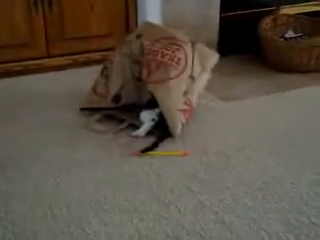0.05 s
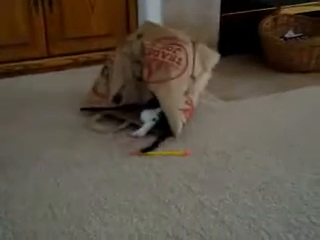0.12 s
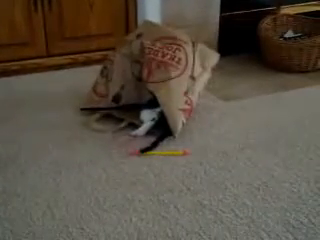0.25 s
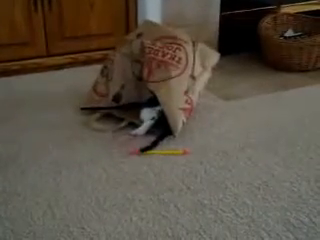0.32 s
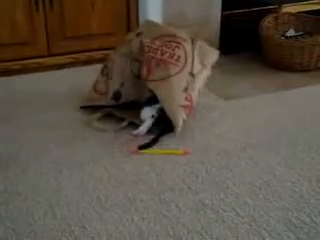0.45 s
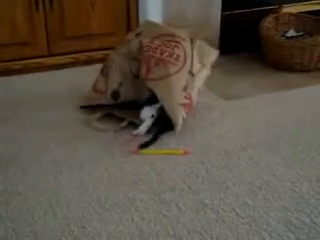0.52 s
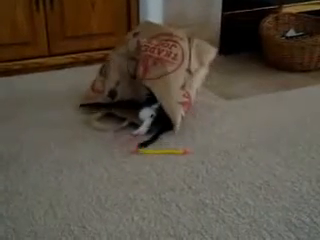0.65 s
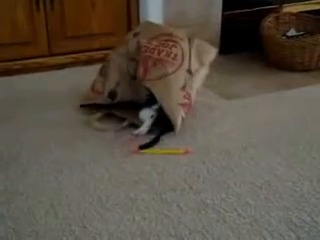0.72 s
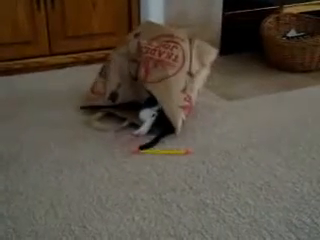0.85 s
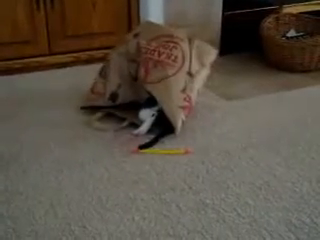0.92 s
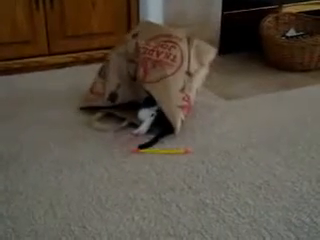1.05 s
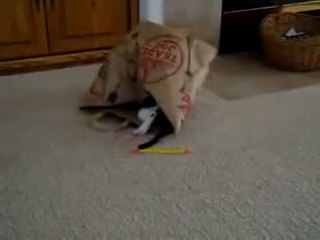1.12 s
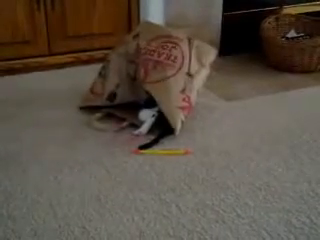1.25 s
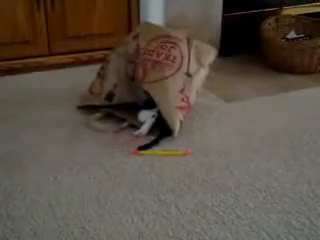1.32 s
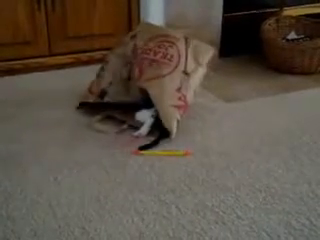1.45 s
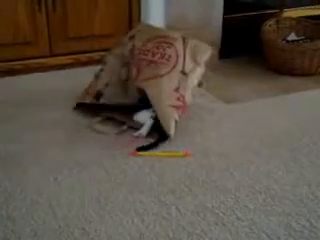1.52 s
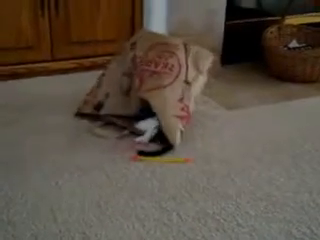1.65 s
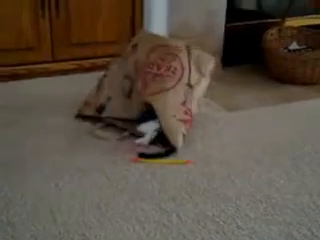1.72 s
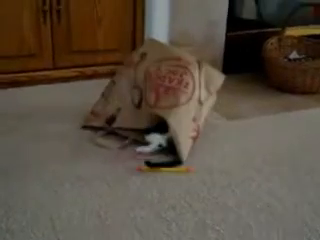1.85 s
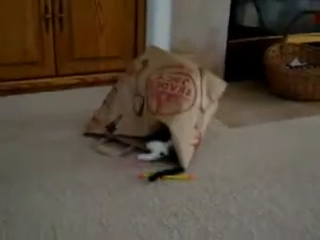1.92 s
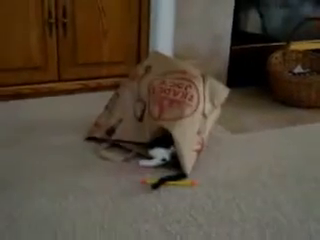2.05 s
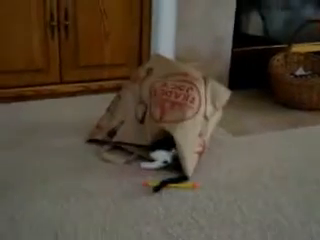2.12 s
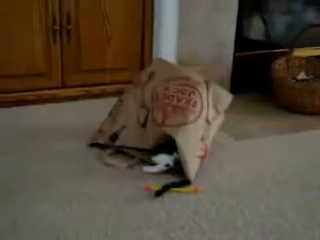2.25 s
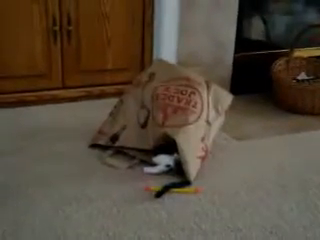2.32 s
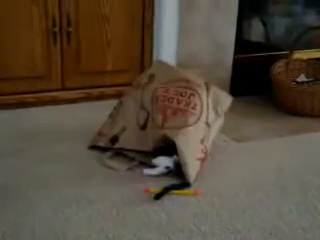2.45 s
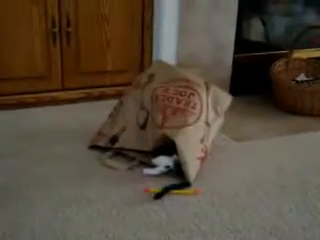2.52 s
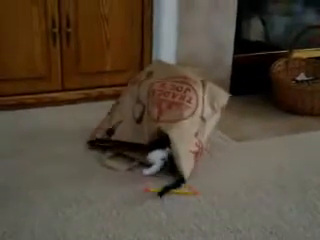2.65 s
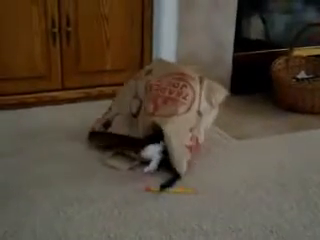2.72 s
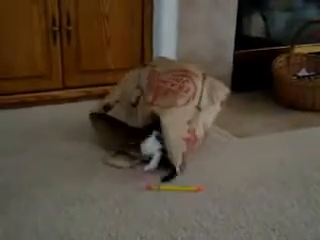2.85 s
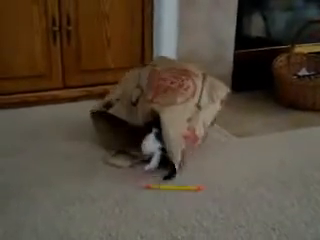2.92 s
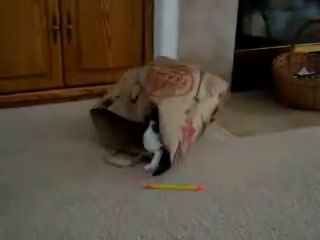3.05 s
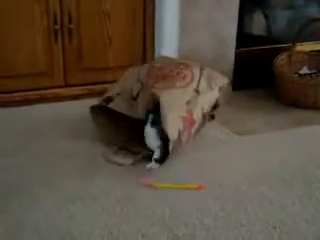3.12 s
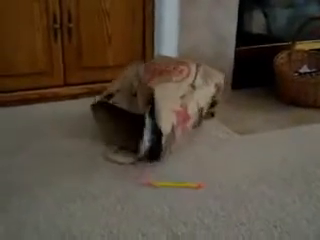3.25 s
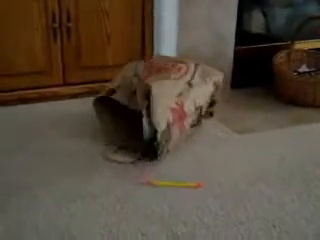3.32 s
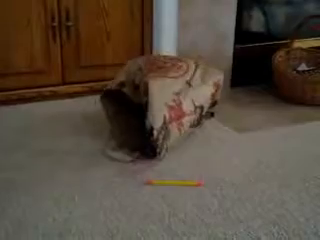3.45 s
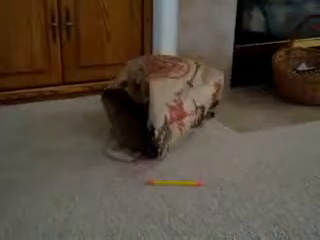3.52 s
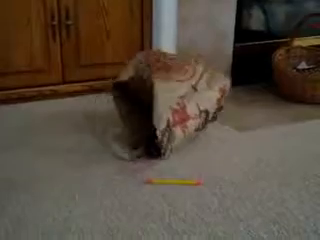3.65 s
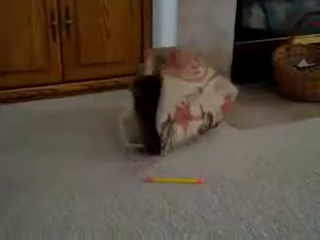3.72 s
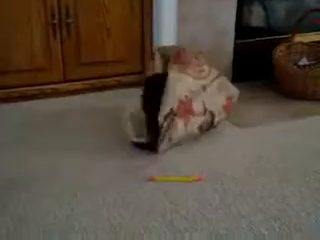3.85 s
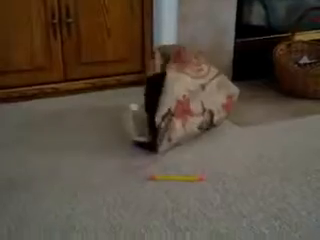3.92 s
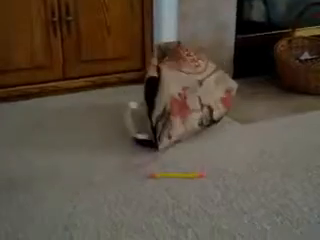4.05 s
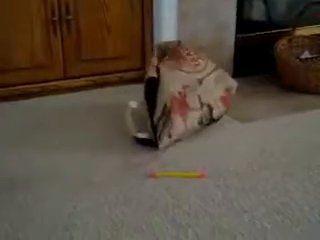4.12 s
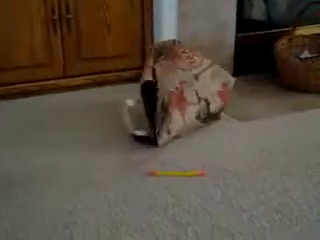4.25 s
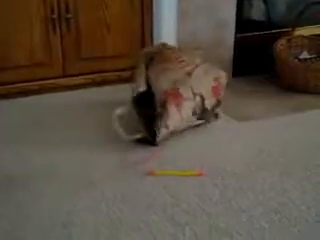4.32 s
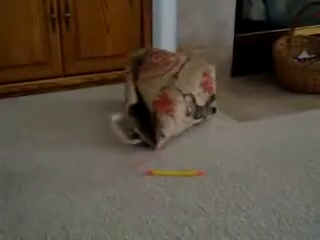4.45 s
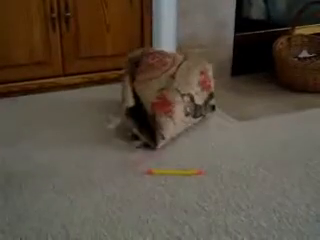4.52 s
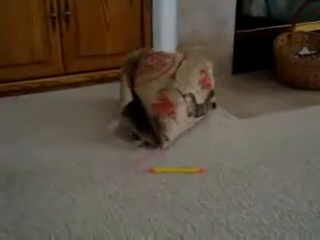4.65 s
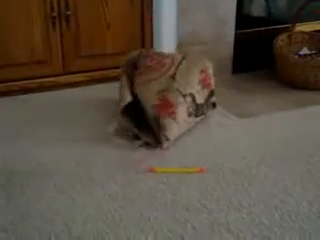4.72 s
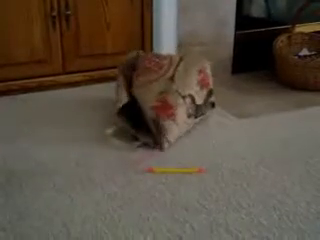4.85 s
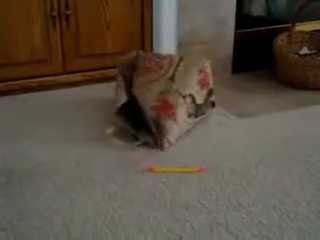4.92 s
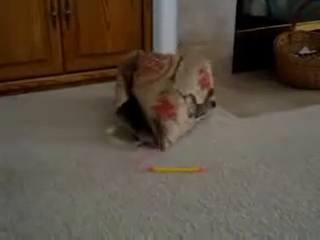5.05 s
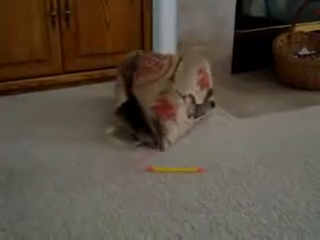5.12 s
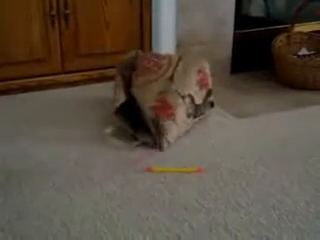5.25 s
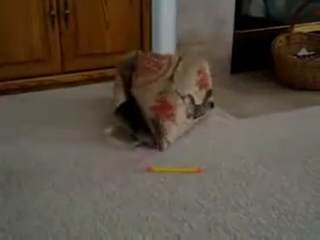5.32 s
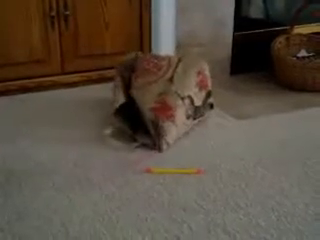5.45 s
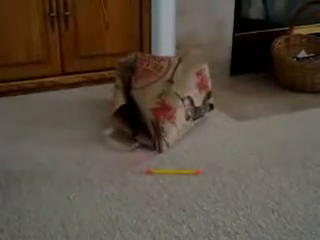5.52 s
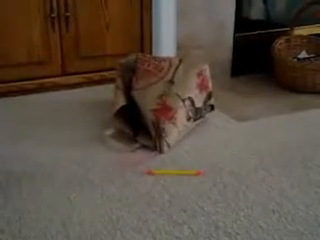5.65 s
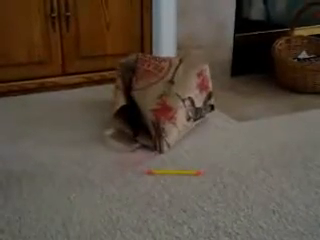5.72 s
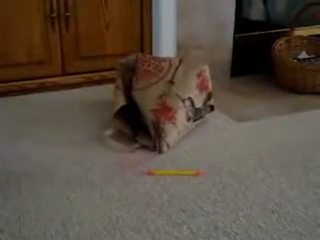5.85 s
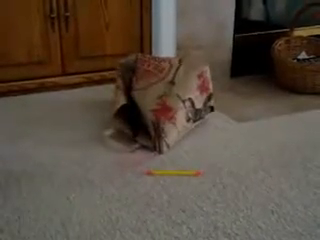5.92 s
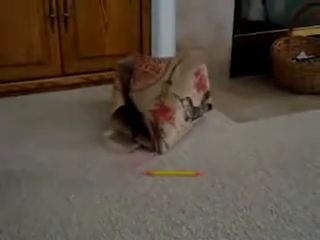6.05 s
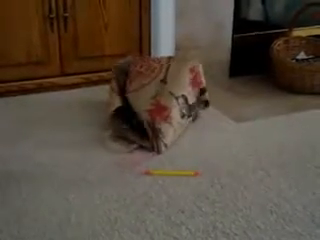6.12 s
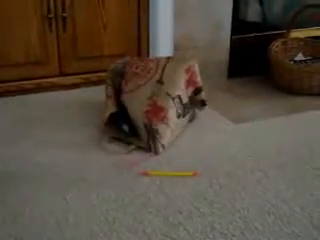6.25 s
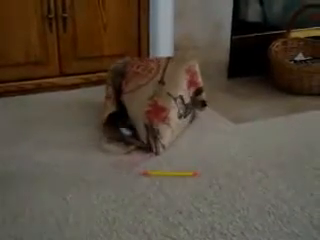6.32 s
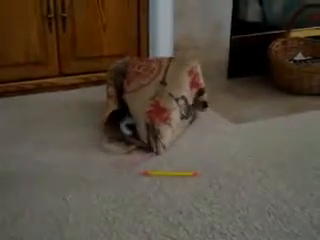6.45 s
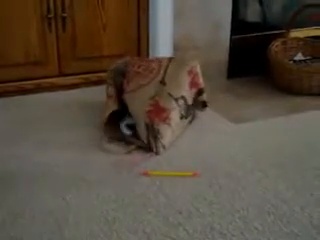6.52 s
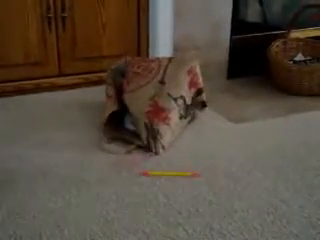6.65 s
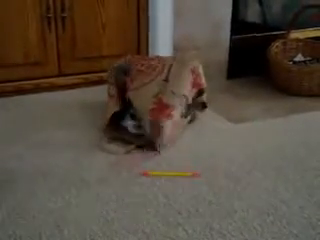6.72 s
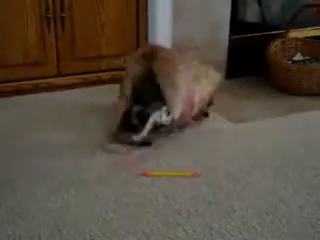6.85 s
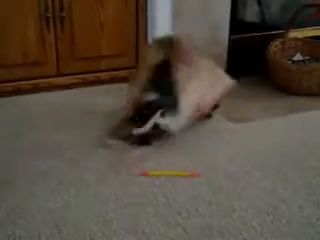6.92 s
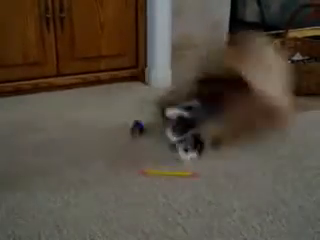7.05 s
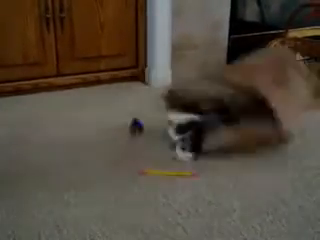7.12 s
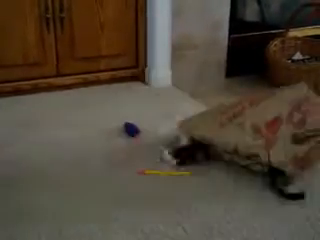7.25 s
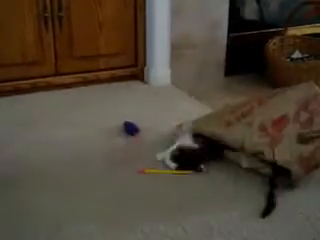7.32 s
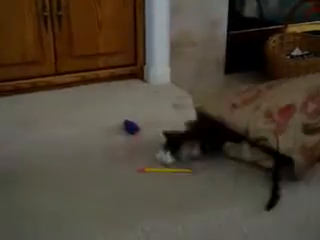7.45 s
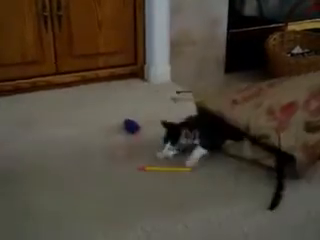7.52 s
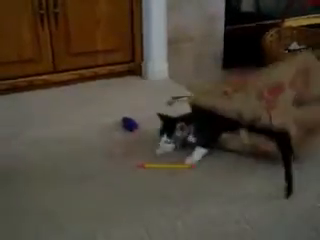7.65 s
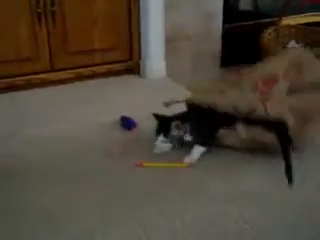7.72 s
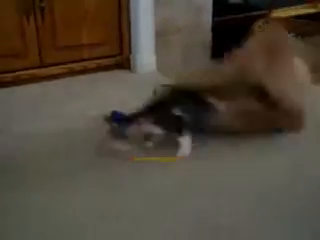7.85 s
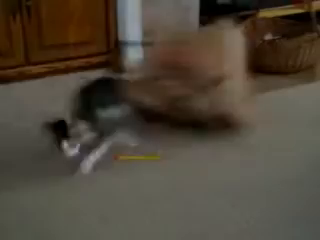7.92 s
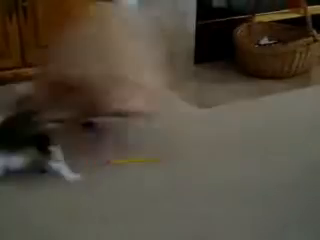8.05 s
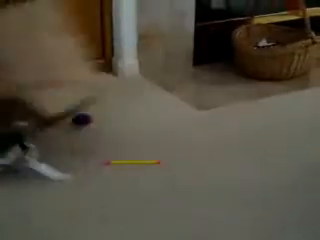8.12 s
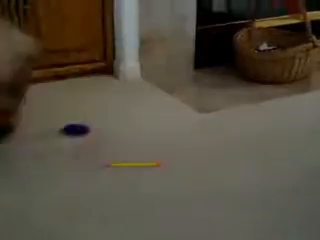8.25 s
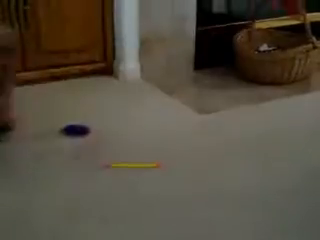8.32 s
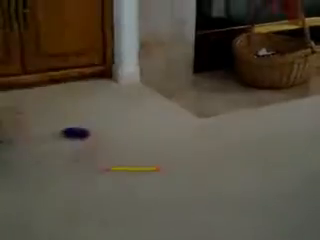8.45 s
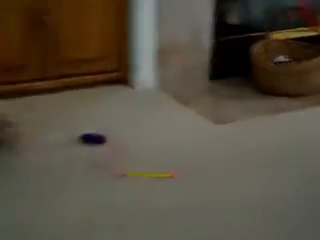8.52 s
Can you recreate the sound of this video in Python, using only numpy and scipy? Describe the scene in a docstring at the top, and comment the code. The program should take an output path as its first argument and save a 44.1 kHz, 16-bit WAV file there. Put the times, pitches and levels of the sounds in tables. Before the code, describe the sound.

Dry, stiff paper crinkles unevenly in a small carpeted room with a faint hiss. Quiet isolated snaps grow into clusters of hollow buckling, low soft thumps of air and dense crackle, then stop for over a second. Rustling resumes briefly before the loudest burst, harsh and rapid, as the animal rushes out dragging the bag; it thins quickly. Heard through a modest handheld camera microphone.

```python
"""Sharp snaps, dense crackle and low puffs: a cat wriggles in a paper grocery bag on carpet, rests, then bolts.
Snaps are noise bursts with a pitched flutter and a low boom; rustle is random ringing clicks plus sliding noise.
Both pass through the paper's dispersion and colour; puffs are low-passed air pulses.
A small furnished room adds a diffuse tail and a hush; a small camera records at half the sample rate."""
import sys
import numpy as np
from scipy import signal
from scipy.fft import rfft, irfft, next_fast_len
from scipy.io import wavfile
from scipy.ndimage import uniform_filter1d, map_coordinates

SR = 44100
rng = np.random.default_rng(int(sys.argv[2]) if len(sys.argv) > 2 else 0)


def generate_wav(sig):
    """Save sig (samples, or channels by samples) to the path in sys.argv[1] as 16-bit PCM at SR."""
    pcm = np.round(np.clip(np.atleast_2d(sig).T, -1, 1) * 32767).astype(np.int16)
    wavfile.write(sys.argv[1], SR, pcm)


N = 377937


def snaps(rows, rise_share=0.33, flutter_stretch=4.1, flutter_db=-9, cycles=7, panel_db=-11,
          boom_stretch=4.2, boom_db=-8, boom_hz=520, gain_db=2):
    """Panels buckle: short ones tick, long ones swell and crumple; width sets pitch and hollowness;
    each flutters and booms."""
    mid_width_cm, mid_pitch_hz, mid_body_db = 10.11, 1085, 3.5  # middling panel
    body_db_per_octave = 13  # per doubling of width
    lead = SR // 50
    out = np.zeros(N + SR)
    t = np.arange(-lead, SR // 6) / SR
    for start_s, level_db, width_cm, t60_s, edge_db in rows:
        # wider panels are lower and more hollow
        pitch_hz = mid_pitch_hz * mid_width_cm / width_cm
        body_db = mid_body_db + body_db_per_octave * np.log2(width_cm / mid_width_cm)
        grit, flutter, slow = rng.standard_normal((3, len(t)))

        fall_db = 60 * np.maximum(t, 0) / t60_s
        rise = amp(60 * np.minimum(t, 0) / (rise_share * t60_s))
        envelope = rise * (amp(-fall_db) + amp(flutter_db - fall_db / flutter_stretch))

        ringing = unit(signal.fftconvolve(flutter, ring(pitch_hz, cycles))[:len(t)])
        panel = amp(panel_db) * envelope * ringing

        boom = signal.sosfilt(signal.butter(2, boom_hz, fs=SR, output="sos"), slow)
        boom = boom * rise * amp(boom_db - fall_db / boom_stretch)  # slowest decay

        snap = tint(grit * envelope + boom, body_db, edge_db) + panel
        attack = envelope[lead:lead + SR // 100]  # level reference: envelope over the first 10 ms
        attack_rms = np.sqrt(np.mean(attack ** 2))
        first = round(start_s * SR) - lead
        out[first:][:len(t)] += amp(level_db + gain_db) * snap / (2 * attack_rms)
    return out[:N]


def extra_snaps(move_db, rate_hz=9, over_db=1, scatter_db=2, width_cm=9, width_octaves=0.71,
                t60_s=0.011, edge_db=-3, count=90):
    """Extra snaps at random moments, as hard as the paper is moved; rows for snaps()."""
    slot, size, width = rng.random((count, 3)).T
    times_s = (np.arange(count) + slot) / rate_hz
    rows = []
    for start_s, a, b in zip(times_s, size, width):
        if SR // 50 < start_s * SR < N:
            level_db = move_db[int(start_s * SR)] + over_db + scatter_db * (2 * a - 1)
            panel_cm = width_cm * 2 ** (width_octaves * (2 * b - 1))
            rows.append((start_s, level_db, panel_cm, t60_s, edge_db))
    return rows


def movement():
    """Each move rises, holds and settles; returns level, and power-weighted body and edge, all in dB."""
    # cat's wriggles, shoves and dashes: t/s, hold/s, relative level/dB, hollow body/dB, crisp edge/dB
    moves = [(0.592, 0.077, -44.5, 6, 3), (0.979, 0.023, -39.5, 5, -10.5), (1.498, 0.17, -48, 12.5, 7.5),
             (1.818, 0.11, -38.5, 13.5, 2), (1.945, 0.048, -32.5, 9.5, 3), (2.085, 0.038, -39, 1, 5),
             (2.21, 0.3, -56.5, 5, 10.5), (2.784, .09, -50.5, 26.5, 9), (2.906, .03, -35, 12, 3.5),
             (2.974, 0.25, -38.5, 13.5, 1), (3.284, 0.11, -46, 10.5, -7), (3.575, 0.026, -45, 21, -17),
             (3.672, .03, -38, 8, -1), (3.775, 0.049, -24, 4.5, -4), (3.91, 0.066, -29.5, 6, -1),
             (4.1, .02, -46, 17, 8.5), (4.171, 0.14, -37.5, 10, 3.5), (4.366, 0.15, -31.5, 13, -2.5),
             (4.586, 0.076, -30.5, 8, -1), (4.714, 0.18, -37, 8, 3.5), (4.901, 0.084, -40.5, 6.5, 4),
             (5.166, .1, -54, 2, 4.5), (5.72, 0.094, -57.5, 20, -6), (6.03, 0.046, -48, 16.5, 3),
             (6.22, 0.06, -39, 12.5, 3.5), (6.341, .13, -37.5, 5, 4.5), (6.772, 0.036, -49, 4, 17),
             (6.89, 0.037, -35, 9, 5.5), (6.956, 0.13, -19, 1.5, 4.5), (7.169, 0.17, -19.5, 2.5, 2.5),
             (7.378, 0.056, -29, 7, -1), (7.586, 0.018, -27.5, -0.5, -1.5), (7.735, 0.13, -40, 7, -11),
             (7.865, 0.23, -25.5, 4.5, 4), (8.312, 0.015, -21.5, -6, 3.5), (8.438, .12, -42, -23, -2.5)]
    rise_db_per_s, settle_db_per_s = 392.5, 207
    fidget_db, fidget_body_db, fidget_edge_db = -58.5, 5, 2.5  # the cat is never quite still
    t = np.arange(N) / SR
    power = np.full(N, amp(fidget_db) ** 2)
    body = fidget_body_db * power
    edge = fidget_edge_db * power
    for start_s, hold_s, level_db, body_db, edge_db in moves:
        before_db = rise_db_per_s * np.maximum(start_s - t, 0)
        after_db = settle_db_per_s * np.maximum(t - start_s - hold_s, 0)
        below_db = before_db + after_db
        near = below_db < 60
        push = amp(level_db - below_db[near]) ** 2
        power[near] += push
        body[near] += push * body_db
        edge[near] += push * edge_db
    return 10 * np.log10(power), body / power, edge / power


def rustle(level_db, body_db, edge_db, rate_hz=1100, spread_db=2.5, clump_db=2.0, calm_db=-10,
           busy_db=-5, slide_db=-6, cycles=4, count=7):
    """Slow movement mostly slides paper over fur and carpet; fast movement also folds clumps of creases."""
    crackle = 0
    for pitch_hz in np.geomspace(600, 7000, num=count):  # crease lengths, each with its own pitch
        clicks = creases(rate_hz / count, spread_db)
        crackle = crackle + pitch_hz * signal.oaconvolve(clicks, ring(pitch_hz, cycles))[:N]
    crackle_db = np.interp(level_db, [-42, -22], [calm_db, busy_db])
    slide = amp(slide_db) * rng.standard_normal(N)
    motion = amp(crackle_db) * unit(crackle) + slide
    clumping = amp(level_db + clump_db * wobble(55))
    return clumping * tint(patchy(motion, depth_db=2.5), body_db, edge_db)


def creases(rate_hz, spread_db):
    """Tiny creases give way at random moments: most are weak, a few stand out."""
    size = amp(spread_db * np.minimum(rng.exponential(size=N), 3))
    fires = rng.random(N) < rate_hz / SR
    clicks = fires * rng.choice([-1, 1], N) * unit(size)
    return clicks * np.sqrt(SR / rate_hz)  # rms near 1 at any rate


def patchy(x, depth_db):
    """As the bag changes shape, different bands of the paper stand out from moment to moment."""
    z = signal.stft(x, nperseg=512)[2]
    field = uniform_filter1d(rng.standard_normal(z.shape), size=7, axis=0)  # across bins
    field = uniform_filter1d(field, size=6, axis=1)  # across frames
    shaped = signal.istft(z * amp(depth_db * unit(field)), nperseg=512)[1][:N]
    return np.std(x) * unit(shaped)


def bag(x, travel_1khz_s=0.001505):
    """Bending waves disperse over the paper, bass behind treble, and radiate with its colour."""
    # paper's radiation colour: f/Hz, relative density/dB per Hz
    paper_colour = [(24, -45), (40, -45.5), (103, -28), (269, -6.5), (360, -6), (403, -1.5), (675, -4),
                    (789, -0.5), (1690, -1.5), (1850, -1.5), (2590, -1), (4540, -10), (8500, -21.5),
                    (11000, -36.5), (18700, -120)]
    spread = filtered(x, lambda hz: np.exp(-4j * np.pi * travel_1khz_s * np.sqrt(1000 * hz)))
    colour = causal(lambda hz: amp(along(paper_colour, hz)))
    return signal.oaconvolve(spread, colour)[:N]


def puffs(rise_s=0.0018, decay_s=.006, top_hz=130):
    """A bag wall caves in and shoves out one low gust of air."""
    # air pushed out of the bag: t/s, peak level/dB
    puff_rows = [(3.719, -40), (4.265, -38.5), (6.944, -36.5), (7.856, -59)]
    out = np.zeros(N + SR)
    t = np.arange(SR // 4) / SR
    push = np.exp(-t / decay_s) * (1 - np.exp(-t / rise_s))
    gust = signal.sosfilt(signal.butter(2, [35, top_hz], "band", fs=SR, output="sos"), push)
    gust = gust / np.abs(gust).max()
    for start_s, peak_db in puff_rows:
        out[round(start_s * SR):][:len(t)] += amp(peak_db) * gust
    return out[:N]


def room(x, build_s=0.0019):
    """A short diffuse tail, drawn afresh every 40 ms so that no steady tones stand out."""
    # room decay: f/Hz, t60/s
    decay_times = [(150, 0.23), (1000, 0.34), (3000, 0.22), (8000, 0.3)]
    out = np.zeros(N + 2 * SR)
    hop = SR // 25
    for start in range(0, N, hop):
        hz, t, z = signal.stft(rng.standard_normal(SR // 3), SR, nperseg=256)
        decay = amp(-60 * t / along(decay_times, hz)[:, None])
        tail = signal.istft(z * decay, SR, nperseg=256)[1]
        tail = tail * (1 - np.exp(-np.arange(len(tail)) / SR / build_s))
        wet = signal.fftconvolve(x[start:start + hop], tail / np.linalg.norm(tail))
        out[start:start + len(wet)] += wet
    return out[:N]


def room_tone(level_db=-51.5):
    """Steady hush of the house and microphone hiss: filtered noise."""
    # room tone and hiss spectrum: f/Hz, relative density/dB per Hz
    quiet_colour = [(15, -67.5), (25, -37.5), (54, -29.5), (159, -4.5), (241, -4.5), (279, -5), (308, -3),
                    (557, -4), (1220, -9.5), (2830, -17), (3120, -16.5), (6530, -20.5), (9000, -26.5),
                    (11700, -19.5), (19800, -120)]
    hush = filtered(rng.standard_normal(N), lambda hz: amp(along(quiet_colour, hz)))
    return amp(level_db) * unit(hush)


def ring(hz, cycles):
    """Impulse response of a paper patch: a sine falling 60 dB in the given cycles."""
    phase = hz * np.arange(SR // 16) / SR
    return np.sin(2 * np.pi * phase) * amp(-60 * phase / cycles)


def tint(x, body_db, edge_db, body_hz=620, edge_hz=3400):
    """Set the levels of the hollow body (lows) and the crisp edge (highs)."""
    body = filtered(x, lambda hz: 1 / (1 + (hz / body_hz) ** 4))
    edge = filtered(x, lambda hz: 1 - 1 / (1 + (hz / edge_hz) ** 6))
    return amp(body_db) * body + (x - body - edge) + amp(edge_db) * edge


def amp(db):
    """Decibels to gain."""
    return 10 ** (np.asarray(db) / 20)


def unit(x):
    """Scale to rms 1."""
    return x / np.sqrt(np.mean(x ** 2) + 1e-20)


def along(points, hz):
    """Interpolate (f/Hz, value) points on a log-frequency axis."""
    f, v = np.transpose(points)
    return np.interp(np.log(hz + 1), np.log(f + 1), v)


def wobble(knots_per_s):
    """Smooth random curve from normal-distributed knots."""
    knots = rng.standard_normal(4096)
    return map_coordinates(knots, [np.arange(N) * knots_per_s / SR], order=2, mode="wrap")


def filtered(x, response):
    """Apply a frequency response by FFT."""
    m = next_fast_len(x.shape[-1] + SR // 4)
    spectrum = rfft(x, m) * response(np.fft.rfftfreq(m, 1 / SR))
    return irfft(spectrum, m)[..., :x.shape[-1]]


def causal(gain, size=8192):
    """Minimum-phase impulse response of a gain curve, energy 1."""
    curve = np.maximum(gain(np.fft.rfftfreq(size, 1 / SR)), 1e-6)
    cepstrum = irfft(np.log(curve))
    cepstrum[1:size // 2] *= 2
    cepstrum[size // 2 + 1:] = 0
    response = irfft(np.exp(rfft(cepstrum)))
    return response / np.linalg.norm(response)


def scene(snap_room_db=-3, rustle_room_db=-4, rustle_db=-2):
    """Bag, its room echo, puffs and the quiet room."""
    # main snaps: t/s, relative level/dB, panel width/cm, crack t60/s, crisp edge/dB
    main_snaps = [(0.305, -23, 2.6, 0.015, 6.5), (0.317, -32, 2.1, 0.013, 1), (0.64, -43, 6.4, 0.02, 12),
                  (0.687, -38, 22.5, 0.037, -9), (0.724, -25, 7.6, 0.022, -9),
                  (0.949, -30, 10.8, 0.021, -15), (0.992, -38, 11, 0.0082, 11), (0.999, -30, 19, .017, -30),
                  (1.236, -40.5, 0.78, .006, 14), (1.414, -42, 13, 0.029, 5.5),
                  (1.589, -37.5, 10.5, 0.023, -6), (1.788, -39, 13, 0.044, -3),
                  (1.927, -29.5, 8.9, .029, -2), (1.965, -29, 12.4, 0.031, -2),
                  (2.365, -46, 26.6, 0.053, -17), (2.612, -43, 15, 0.052, -25),
                  (2.763, -53, 37, 0.019, -16), (2.793, -36, 12, .031, -21), (2.885, -37, 14, .029, -3),
                  (3.001, -17, 10.6, 0.033, -7.5), (3.033, -20.5, 15, 0.012, -6),
                  (3.09, -29.5, 15.5, 0.05, -19), (3.18, -25.5, 13.2, 0.033, -12),
                  (3.221, -23, 10, 0.04, -23), (3.294, -25.5, 10.1, 0.028, -12.5),
                  (3.482, -30.5, 10, .03, -21), (3.72, -17, 5.8, 0.011, 2.5), (3.734, -22, 7.4, .018, -16),
                  (3.763, -24.5, 9.3, .026, 6.5), (3.89, -20, 14, .036, 6), (3.901, -21, 15.3, 0.025, -11),
                  (4.189, -25.5, 9.2, 0.037, -2), (4.267, -20.5, 2.9, 0.022, 4),
                  (4.35, -24, 6.8, 0.028, 4.5), (4.387, -21.5, 9.8, 0.026, 0),
                  (4.451, -26, 11.4, .036, -25), (4.512, -29.5, 13.7, 0.016, 2.5),
                  (4.572, -24, 13, 0.098, 0.5), (4.592, -18.5, 12, .028, 0.5), (4.649, -25, 16, 0.022, -1),
                  (4.684, -28.5, 9.9, .009, -12), (6.119, -25, 19.5, 0.034, -7),
                  (6.214, -33.5, 10, 0.029, -17), (6.323, -20, 4.2, .022, -3),
                  (6.37, -26.5, 11.5, 0.043, -8), (6.398, -26, 9.4, 0.044, 6),
                  (6.751, -36, 11.3, 0.046, -11), (6.932, -19.5, 11.4, 0.06, -16),
                  (6.947, -13.5, 12, .032, -3.5), (6.965, -18.5, 5.6, 0.025, 7.5),
                  (6.979, -18.5, 7.4, 0.03, -4), (7.012, -15.5, 9.4, .009, -5), (7.051, -16, 6.5, 0.1, 3),
                  (7.146, -12, 2.7, .031, -0.5), (7.154, -15, 6.7, 0.01, -1.5),
                  (7.198, -12.5, 6.2, 0.032, -2), (7.215, -21, 5, 0.024, 11), (7.275, -12, 7.5, .055, -3.5),
                  (7.329, -21.5, 13.5, 0.064, 6), (7.363, -24.5, 7.8, 0.02, -5),
                  (7.507, -24, 7.3, 0.014, -1.5), (7.566, -18.5, 10.5, .013, -3.5),
                  (7.588, -25, 13, 0.027, -3), (7.726, -34.5, 11.5, 0.034, 1.5),
                  (7.758, -29, 10, 0.034, -19), (7.795, -25, 12, 0.013, -2.5),
                  (7.811, -24, 11.8, 0.033, -30), (7.856, -23, 11.5, 0.011, 9.5),
                  (7.917, -23.5, 6, .036, 10), (7.969, -15.5, 4.3, 0.11, 8.5),
                  (8.072, -29.5, 6.8, 0.037, 14.5), (8.299, -29, 8.6, 0.034, 6.5),
                  (8.45, -30.5, 2.4, 0.036, -0.5), (8.505, -28, 3.3, 0.014, -7.5)]
    level_db, body_db, edge_db = movement()
    snapping = bag(snaps(list(main_snaps) + extra_snaps(level_db)))
    rustling = amp(rustle_db) * bag(rustle(level_db, body_db, edge_db))
    echo = room(amp(snap_room_db) * snapping + amp(rustle_room_db) * rustling)
    return (snapping + rustling + echo + puffs() + room_tone())[None]


def record(dry, ceiling=.85, band_hz=9600, top_hz=16200):
    """The camera rounds off high peaks, samples at half rate and joins samples by straight lines."""
    # microphone colour: f/Hz, gain/dB
    mic_colour = [(100, -2.5), (3000, 1.5), (6000, 3.5), (8500, 2), (9500, -0.5)]
    heard = filtered(dry[0], lambda hz: amp(along(mic_colour, hz)))
    rounded = heard / (1 + np.abs(heard / ceiling) ** 6) ** (1 / 6)
    band = filtered(rounded, lambda hz: 1 / (1 + (hz / band_hz) ** 60))
    joined = np.interp(np.arange(N), np.arange(0, N, 2), band[::2])  # mirrors the treble faintly
    return filtered(joined, lambda hz: hz < top_hz)[None]


dry = scene()
out = record(dry)
generate_wav(out)
```